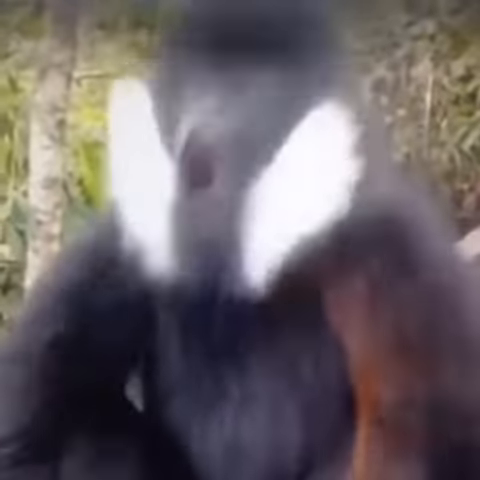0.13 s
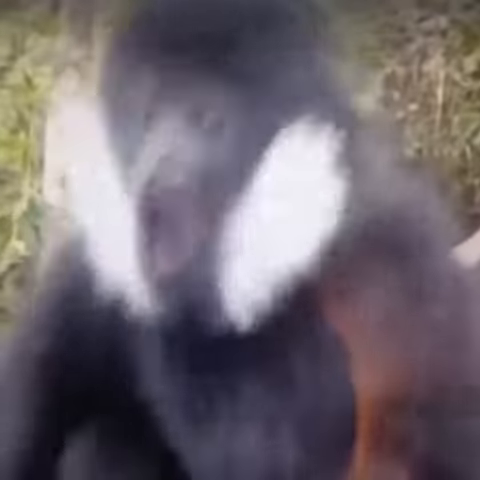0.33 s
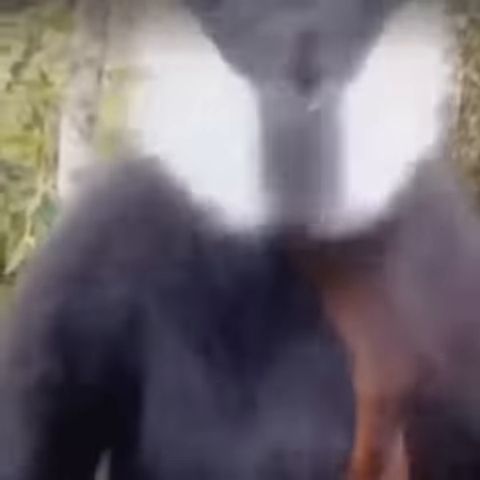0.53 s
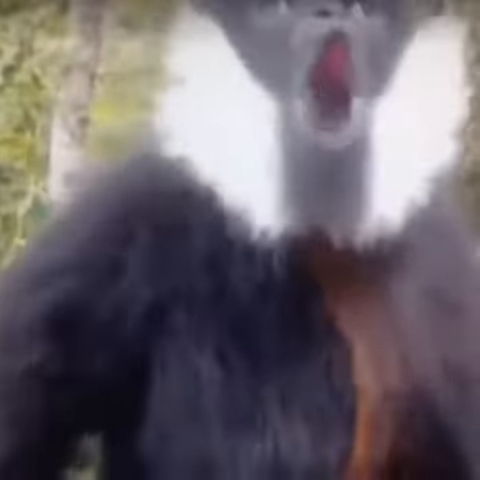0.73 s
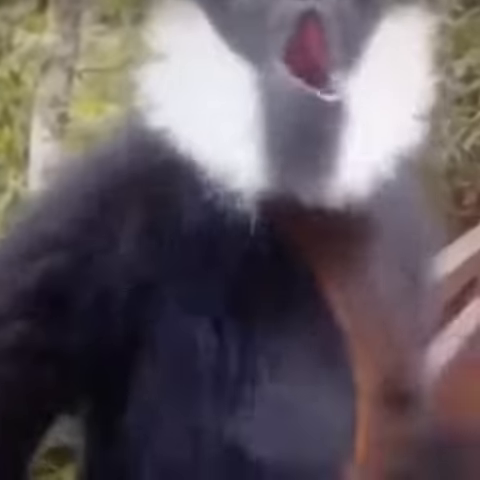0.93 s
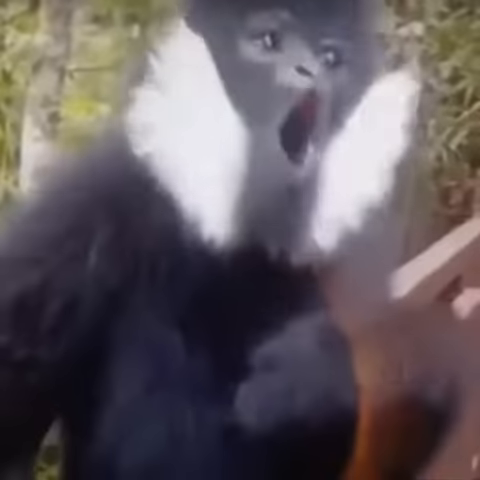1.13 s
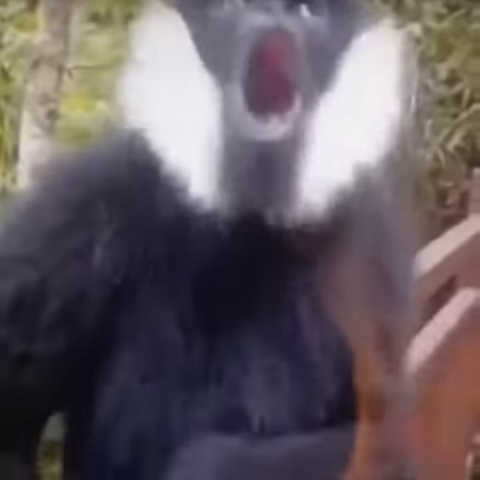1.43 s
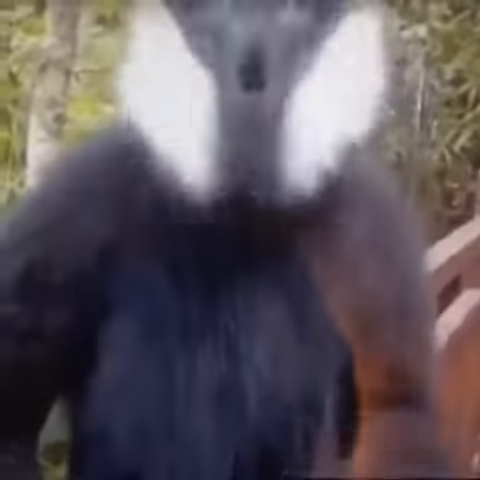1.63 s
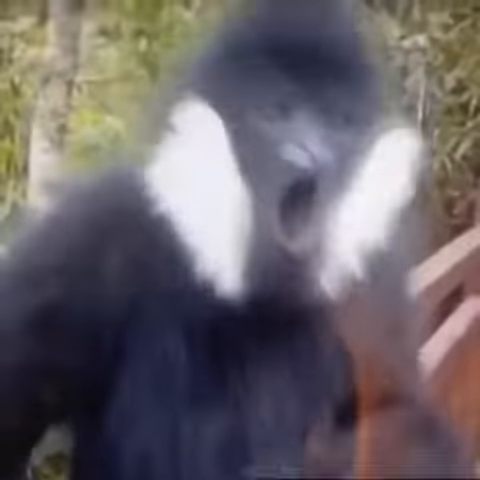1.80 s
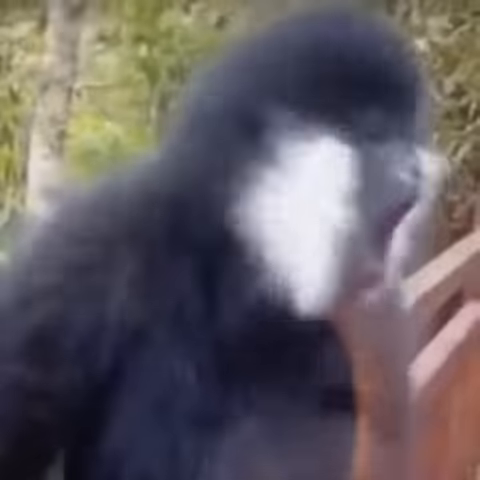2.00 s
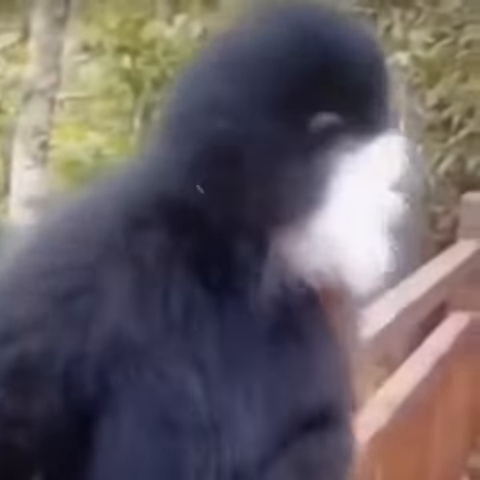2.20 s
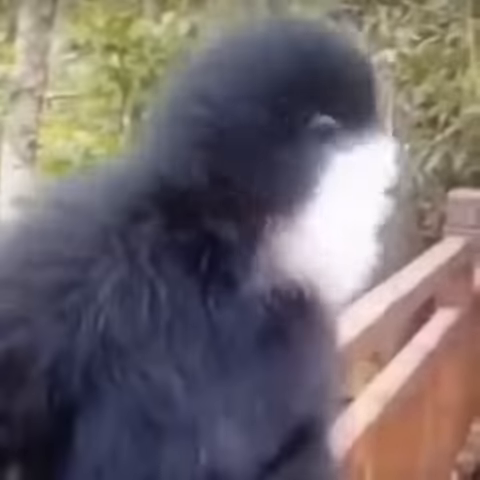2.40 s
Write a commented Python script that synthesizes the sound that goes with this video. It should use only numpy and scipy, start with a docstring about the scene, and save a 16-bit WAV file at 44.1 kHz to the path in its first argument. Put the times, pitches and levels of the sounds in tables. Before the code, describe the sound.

A gibbon close to the microphone gives four loud, nearly pure whoops that climb into fast, widening trills, echoing lightly off trees, over faint distant calls, low machine hum and soft hiss.

```python
"""Throughout: a wavering low machine hum (sines) and a faint hiss (coloured noise).
From the start, far calls: a flickering noise band, soon sinking and later rising a little.
Then a gibbon close by gives four rising whoops with widening trills: gliding multiples plus air.
Single echoes, near trunks and leaf-blurred woods answer each whoop (delays and sparse decaying taps).
During the fourth whoop comes one soft, dull knock (a decaying noise band)."""
import sys
import numpy as np
from scipy import signal
from scipy.fft import rfft, irfft, next_fast_len
from scipy.io import wavfile
from scipy.ndimage import uniform_filter1d

SR = 44100
rng = np.random.default_rng(int(sys.argv[2]) if len(sys.argv) > 2 else 0)


def generate_wav(signal):
    """Clip the signal to [-1, 1] and save it as 16-bit WAV at the path in sys.argv[1]."""
    frames = np.transpose(np.atleast_2d(signal))
    scaled = np.clip(frames, -1, 1) * 32767
    pcm = np.round(scaled).astype(np.int16)
    wavfile.write(sys.argv[1], SR, pcm)


def volts_from_db(level):
    """Convert decibel levels to linear amplitude ratios."""
    exponent = np.asarray(level, float) / 20
    return 10 ** exponent


N = 112455

# turning points of each whoop's trill: time_s, pitch_hz, level_db (before throat), second_multiple_db (relative)
WHOOP_TURNS = [
    [(.135, 740, -78, -6.5), (.175, 960, -53, -0.5), (.205, 910, -61.5, 3), (.235, 1010, -55, 3),
     (.265, 960, -53.5, -4.5), (.295, 1190, -48.5, -4.5), (.327, 1020, -52.5, 0.5), (.366, 1430, -51, -6),
     (.402, 1090, -52.5, 0.5), (.44, 1600, -42, -4), (.478, 1200, -52.5, 2), (.518, 1730, -42.5, -12),
     (.558, 1110, -62.5, 8), (.585, 1170, -59.5, 9.5)],
    [(.745, 790, -87, 8), (.768, 815, -60, -5.5), (.787, 805, -56.5, -21), (.82, 865, -54, -14),
     (.842, 855, -57, -13), (.88, 985, -48, -2.5), (.912, 922, -51.5, -3), (.949, 1200, -44, -6.5),
     (.985, 985, -46.5, -6), (1.027, 1415, -49.5, -13), (1.066, 1070, -46, -3), (1.108, 1575, -52.5, -9),
     (1.147, 1140, -46.5, -5.5), (1.19, 1735, -48.5, 0), (1.226, 1130, -61.5, -3),
     (1.24, 1000, -77.5, 25.5)],
    [(1.378, 740, -73, -8), (1.425, 1015, -46.5, -4), (1.452, 955, -47, -3.5), (1.486, 1180, -44, -1),
     (1.52, 1040, -45.5, 2.5), (1.559, 1460, -47, -18), (1.595, 1165, -44.5, 4), (1.635, 1625, -50.5, -29),
     (1.673, 1225, -48, -0.5), (1.715, 1720, -48.5, -3), (1.753, 1270, -49.5, 1.5), (1.797, 1810, -46.5, 2),
     (1.835, 1080, -79.5, 20)],
    [(1.978, 786, -75, -26), (2.012, 878.4, -59.5, -5), (2.045, 1030, -46, 2.5), (2.072, 990, -50.5, -0.5),
     (2.104, 1260, -46, 9.5), (2.137, 1115, -50.5, 15), (2.178, 1565, -45, -6.5), (2.215, 1200, -47.5, 9.5),
     (2.257, 1760, -49.5, -19), (2.295, 1190, -46.5, 8), (2.337, 1810, -48.5, -19), (2.378, 1110, -51, -1),
     (2.422, 1740, -55, -10), (2.46, 1150, -62.5, 5)],
]
# throat colour of the first two multiples: freq_hz, gain_db
THROAT_COLOUR = [(700, -9.5), (940, -4.5), (990, -10.5), (1030, -24), (1075, -9.5), (1150, -2), (1280, 2),
                 (1450, -9), (1600, -1.5), (1750, 5.5), (2050, -0.5), (2250, -15.5), (2450, -19.5),
                 (2600, -20), (2800, -23), (3100, -24.5), (3500, -17)]
# mouth colour of the third to eighth multiples: freq_hz, gain_db
MOUTH_COLOUR = [(2400, -4), (2900, -6), (3300, -9), (3700, -6), (4200, 0), (4900, 0), (5300, -5),
                (5700, -16), (7000, -13), (7800, -7), (8100, -50)]
# level of the upper multiples before the mouth: time_s, third_db, fourth_and_higher_db
UPPER_LEVELS = [(.15, -92, -92), (.19, -82, -76), (.235, -71, -74), (.3, -73, -73), (.366, -70, -74),
                (.44, -70, -71), (.52, -74, -76), (.57, -88, -90), (.76, -78, -92), (.82, -73, -88),
                (.88, -77, -70), (.95, -68, -73), (1.03, -69, -72), (1.11, -71, -80), (1.15, -72, -82),
                (1.21, -76, -84), (1.4, -92, -88), (1.43, -84, -68), (1.5, -82, -73), (1.56, -67, -78),
                (1.6, -80, -76), (1.64, -72, -78), (1.71, -82, -80), (1.76, -71, -76), (1.82, -75, -82),
                (2.015, -92, -88), (2.045, -88, -68), (2.105, -86, -68), (2.15, -80, -76), (2.18, -64, -75),
                (2.22, -80, -76), (2.26, -75, -80), (2.34, -78, -82), (2.45, -82, -90)]
# offsets of multiples 4 to 8: offset_db
HIGHER_OFFSETS = [-2, 0, -0.5, -2.5, -4]
# air level in the voice, before trill and shimmer: time_s, level_db
AIR_LEVELS = [(.15, -89), (.25, -87), (.4, -71), (.52, -75.5), (.57, -91), (.76, -95), (.85, -100),
              (.92, -74), (1.2, -71), (1.24, -77), (1.39, -82), (1.45, -72), (1.6, -68.5), (1.8, -70),
              (1.835, -78.5), (1.99, -86), (2.06, -83), (2.18, -69), (2.35, -75.5), (2.45, -97)]
# relative spectrum of that air: freq_hz, density_db_per_hz
AIR_COLOUR = [(900, -40), (1300, -13), (2200, -7.5), (2700, -14.5), (3100, -6.5), (3500, -14), (4300, -8),
              (4900, 0.5), (5400, -6.5), (5900, -14), (7000, -14.5), (7800, -7.5), (8100, -71)]
# the one knock: time_s, level_db, t60_s
KNOCK_EVENT = (2.287, -66, .05)
# relative spectrum of the knock: freq_hz, density_db_per_hz
KNOCK_COLOUR = [(250, -39), (360, 9), (600, -11), (1000, -7), (1500, -45)]
# single echoes: delay_s, level_db
SINGLE_ECHOES = [(.019, -15), (.037, -18)]
# decay of the near trunks: freq_hz, t60_s
TRUNK_DECAY = [(900, 0.23), (1500, 0.21), (2500, 0.089), (5000, 0.12)]
# decay of the far woods: freq_hz, t60_s
WOODS_DECAY = [(900, .7), (1500, .8), (2500, .7), (5000, .4)]
# machine lines: freq_hz, level_db, waver_db, waver_hz (rms pitch deviation)
HUM_LINES = [(46.1, -61, 1.5, 0.38), (86, -73.5, 5.5, 3.7), (98.6, -75, 6, 4.5)]
# level of the far calls, before flicker: time_s, level_db
FAR_LEVELS = [(0, -68), (.15, -77.5), (.7, -91), (1.35, -82), (1.95, -80), (2.55, -76)]
# relative spectrum of the far calls: freq_hz, density_db_per_hz
FAR_COLOUR = [(1000, -20.5), (1250, 10.5), (1450, 5.5), (1750, 4), (2300, -1.5), (2700, -26)]
# relative spectrum of the hiss: freq_hz, density_db_per_hz
HISS_COLOUR = [(8, -16.5), (33, -12), (60, 0), (75, -5.5), (110, -4.5), (150, -10), (190, -15), (220, -8.5),
               (260, -16.5), (320, -11.5), (543, -17.5), (700, -21), (979, -23.5), (1250, -18.5),
               (1810, -19.5), (3830, -29), (7900, -30.5), (8300, -30), (16000, -37.5)]


def evened(x):
    """Scales to rms 1."""
    return x / np.sqrt(np.mean(x ** 2) + 1e-20)


def read(points, hz):
    """Reads a table on a log-frequency axis."""
    freq_hz, value = np.transpose(points)
    return np.interp(np.log(hz + 1), np.log(freq_hz + 1), value)


def add(mix, start_s, sound):
    """Mixes a sound in at start_s."""
    part = mix[round(start_s * SR):][:len(sound)]
    part += sound[:len(part)]


def noise(colour, size):
    """Noise of rms 1 with the given colour, silent outside it."""
    hz = np.fft.rfftfreq(size, 1 / SR)
    inside = (hz >= colour[0][0]) & (hz <= colour[-1][0])
    spectrum = rfft(rng.standard_normal(size)) * volts_from_db(read(colour, hz)) * inside
    return evened(irfft(spectrum, size))


def slow(rate_hz, size):
    """Slow random drift of rms 1: noise low-passed near rate_hz."""
    hz = np.fft.rfftfreq(size, 1 / SR)
    spectrum = rfft(rng.standard_normal(size)) * (hz > 0) / (1 + (hz / rate_hz) ** 4)
    return evened(irfft(spectrum, size))


def trill_pitch(t, time_s, pitch_hz):
    """Pitch gliding between turning points by half cosines, with 0.2 % rms jitter."""
    index = np.arange(len(time_s))
    place = np.interp(t, time_s, index)
    eased = np.floor(place) + 0.5 - 0.5 * np.cos(np.pi * (place % 1))
    jitter = 0.002 * slow(180, next_fast_len(N))[:len(t)]
    return np.interp(eased, index, pitch_hz) * (1 + jitter)


def low_multiples(t, hz, phase, level_db, second_db):
    """Fundamental and second multiple through the throat; the second fades at high pitch."""
    pure_hz, pure_db_per_oct = 1250, -30
    second_db = 3 + second_db + pure_db_per_oct * np.log2(np.maximum(hz / pure_hz, 1))
    first = volts_from_db(read(THROAT_COLOUR, hz)) * np.sin(phase)
    second = volts_from_db(second_db + read(THROAT_COLOUR, 2 * hz)) * np.sin(2 * phase)
    shimmer_db = 0.5 * slow(130, next_fast_len(N))[:len(t)]
    return (first + second) * volts_from_db(level_db + shimmer_db)


def upper_multiples(t, hz, phase):
    """Multiples 3 to 8 through the mouth, each with its own shimmer."""
    time_s, third_db, higher_db = np.transpose(UPPER_LEVELS)
    levels_db = [np.interp(t, time_s, third_db)]
    for offset_db in HIGHER_OFFSETS:
        levels_db.append(offset_db + np.interp(t, time_s, higher_db))
    upper = np.zeros(len(t))
    for k, level_db in zip(range(3, 9), levels_db):
        shimmer_db = 3 * slow(46, next_fast_len(N))[:len(t)]
        upper += volts_from_db(level_db + read(MOUTH_COLOUR, k * hz) + shimmer_db) * np.sin(k * phase)
    return upper


def voice_air(t, hz):
    """Air noise that dips as the trill rises above its running mean pitch."""
    rasp_db_per_oct = -3.5
    size = next_fast_len(N)
    trill_oct = np.log2(hz / uniform_filter1d(hz, size=3500))
    shimmer_db = 1.5 * slow(20, size)[:len(t)]
    level_db = np.interp(t, *np.transpose(AIR_LEVELS)) + rasp_db_per_oct * trill_oct + shimmer_db
    return volts_from_db(level_db) * noise(AIR_COLOUR, size)[:len(t)]


def whoop(rows):
    """A nearly pure voice: gliding fundamental, a few overtones and some air; gives start_s, sound."""
    time_s, pitch_hz, level_db, second_db = np.transpose(rows)
    t = np.arange(time_s[0], time_s[-1], 1 / SR)
    hz = trill_pitch(t, time_s, pitch_hz)
    phase = 2 * np.pi * np.cumsum(hz) / SR
    low = low_multiples(t, hz, phase, np.interp(t, time_s, level_db), np.interp(t, time_s, second_db))
    voiced = np.sqrt(2) * (low + upper_multiples(t, hz, phase))
    fade_s = 0.008
    fade = np.minimum(np.minimum(t - time_s[0], time_s[-1] - t) / fade_s, 1)
    return time_s[0], fade * (voiced + voice_air(t, hz))


def knock(start_s, level_db, t60_s):
    """One soft, dull knock: a noise band with 1 ms attack and exponential decay."""
    t = np.arange(SR // 5) / SR
    envelope = volts_from_db(level_db - 60 * t / t60_s) * np.minimum(t / 0.001, 1)
    return start_s, envelope * noise(KNOCK_COLOUR, len(t))


def trees(x):
    """Single echoes, near trunks, and far woods whose echo is blurred by moving leaves."""
    trunks_db, woods_db, leaves_hz = -17, -23, 23
    near = tail(TRUNK_DECAY, trunks_db)
    for delay_s, level_db in SINGLE_ECHOES:
        add(near, delay_s, volts_from_db([level_db]))
    turn = 2 * np.pi * leaves_hz * np.arange(N) / SR
    far = np.zeros(N)
    for side in (np.sin(turn), np.cos(turn)):
        far += signal.fftconvolve(x * side, tail(WOODS_DECAY, woods_db))[:N]
    return signal.fftconvolve(x, near)[:N] + far


def tail(decay, level_db):
    """Sparse taps of random sign, dying band by band."""
    taps = np.zeros(SR)
    at = np.arange(300, SR - 20, 20)
    taps[at + rng.integers(0, 20, len(at))] = rng.choice([-1., 1.], len(at))
    hz, t, bands = signal.stft(taps, SR, nperseg=256)
    bands = bands * volts_from_db(-60 * t / read(decay, hz)[:, None])
    taps = signal.istft(bands, SR, nperseg=256)[1]
    return volts_from_db(level_db) * taps / np.linalg.norm(taps)


def far_calls():
    """A faint band of calls far off: noise with a drawn level and random flicker."""
    flicker_db, flicker_hz = 2.5, 12
    level_db = np.interp(np.arange(N) / SR, *np.transpose(FAR_LEVELS))
    return volts_from_db(level_db + flicker_db * slow(flicker_hz, N)) * noise(FAR_COLOUR, N)


def hum():
    """Low lines of a distant machine: sines wavering in level and pitch."""
    lines = np.zeros(N)
    for freq_hz, level_db, waver_db, waver_hz in HUM_LINES:
        level = np.sqrt(2) * volts_from_db(level_db + waver_db * slow(5.5, N))
        hz = freq_hz + waver_hz * slow(4.82, N)
        lines += level * np.sin(2 * np.pi * np.cumsum(hz) / SR)
    return lines


def hiss():
    """Steady coloured noise of fixed rms."""
    level_db = -70
    return volts_from_db(level_db) * noise(HISS_COLOUR, N)


def scene():
    """Gibbon and knock with echoes, over far calls, hum and hiss."""
    near = np.zeros(N)
    for rows in WHOOP_TURNS:
        add(near, *whoop(rows))
    add(near, *knock(*KNOCK_EVENT))
    far = far_calls()
    return (near + trees(near) + hum() + far + hiss())[None]


def low_pass(x):
    """Removes everything above the highest recorded frequency."""
    return signal.sosfilt(signal.butter(12, 15170, fs=SR, output="sos"), x)


def record(dry):
    """Takes the scene as the finished mix and cuts off the treble above about 15 kHz."""
    return low_pass(dry)


dry = scene()
out = record(dry)
generate_wav(out)
```